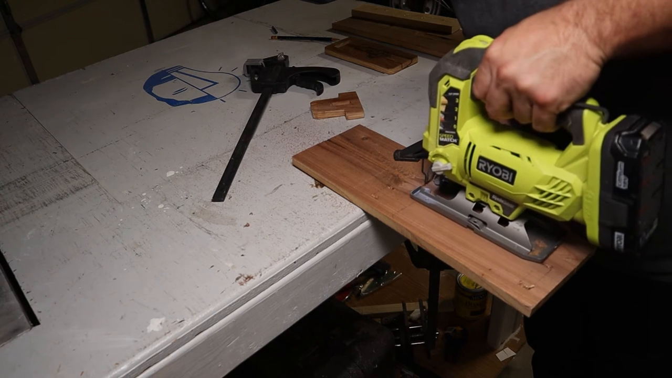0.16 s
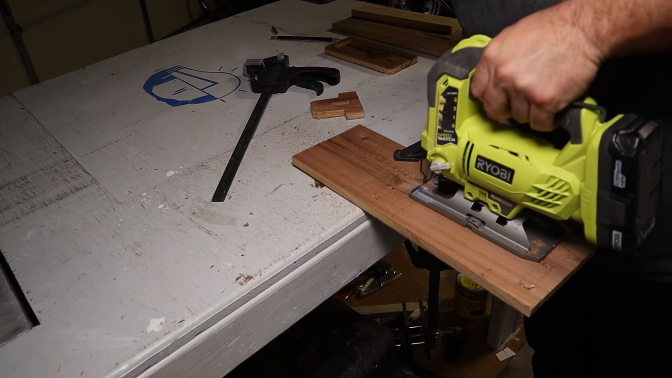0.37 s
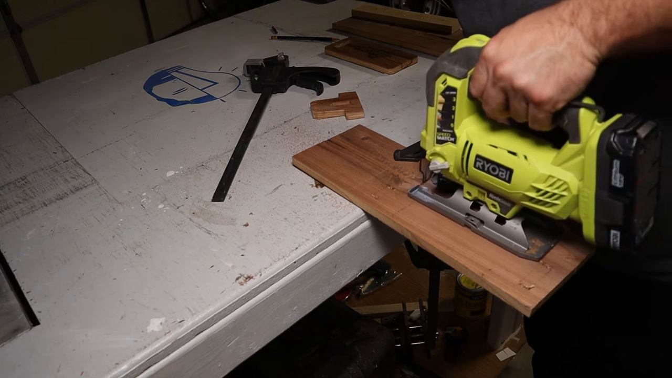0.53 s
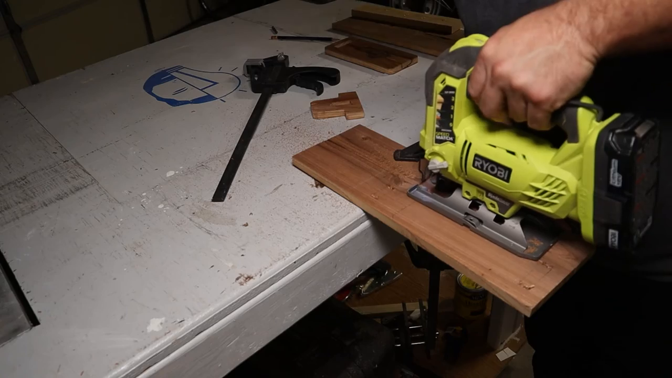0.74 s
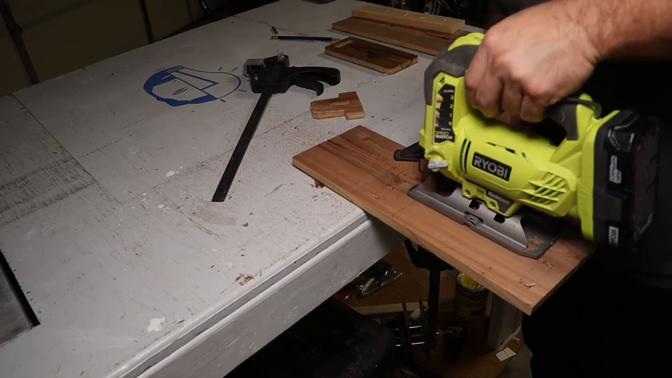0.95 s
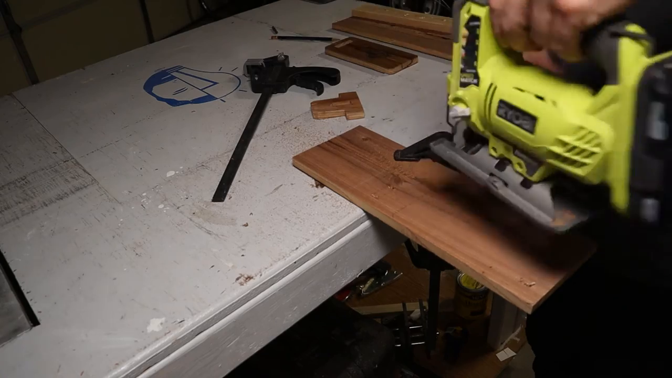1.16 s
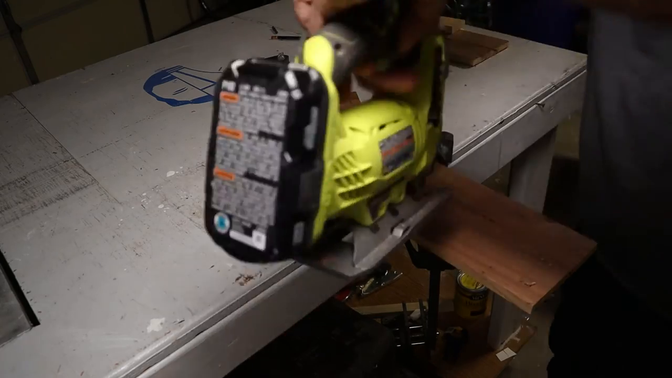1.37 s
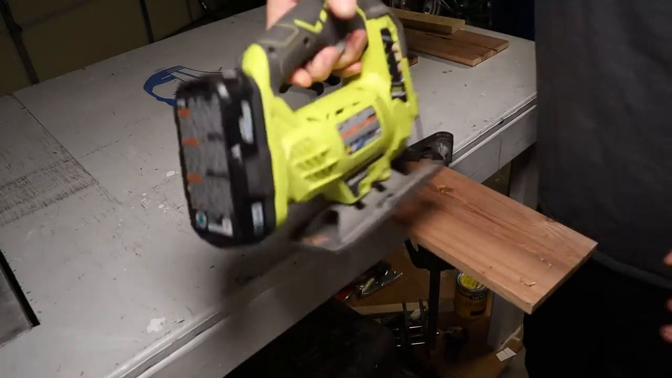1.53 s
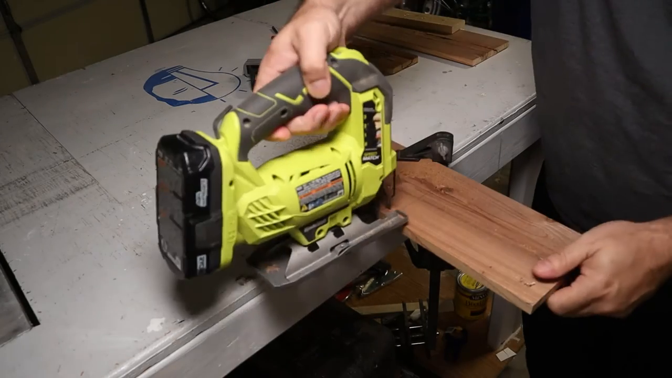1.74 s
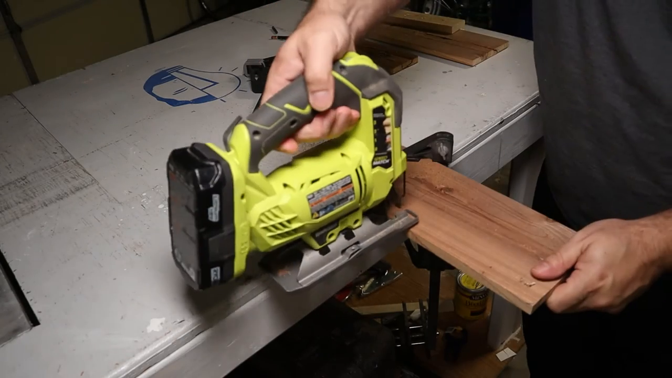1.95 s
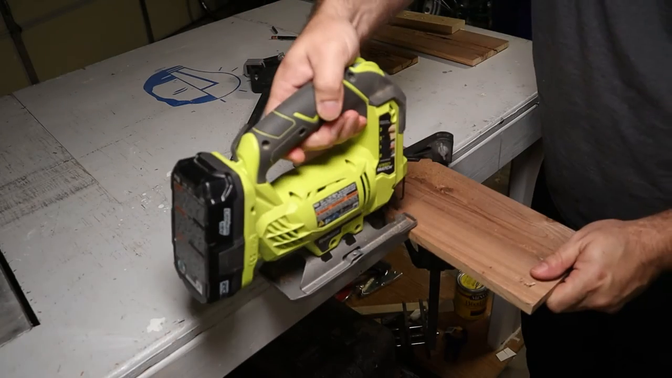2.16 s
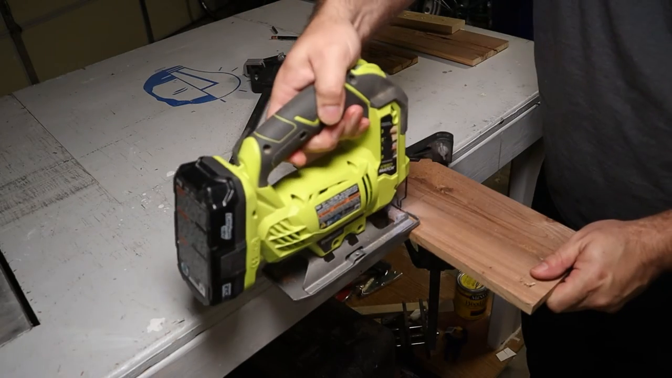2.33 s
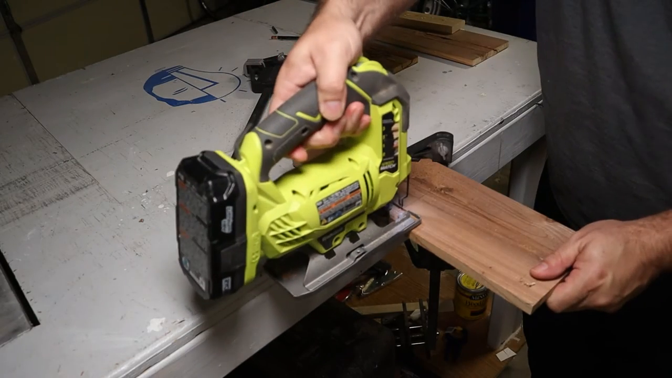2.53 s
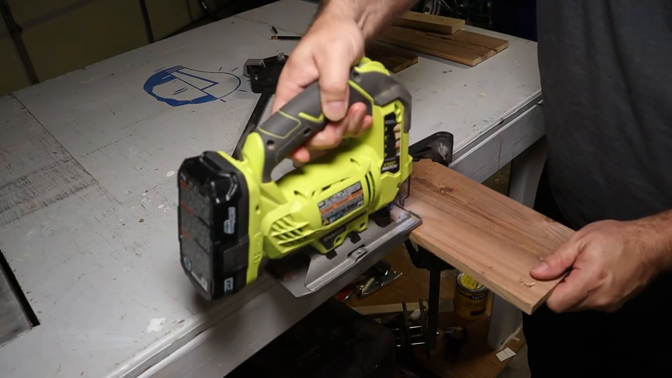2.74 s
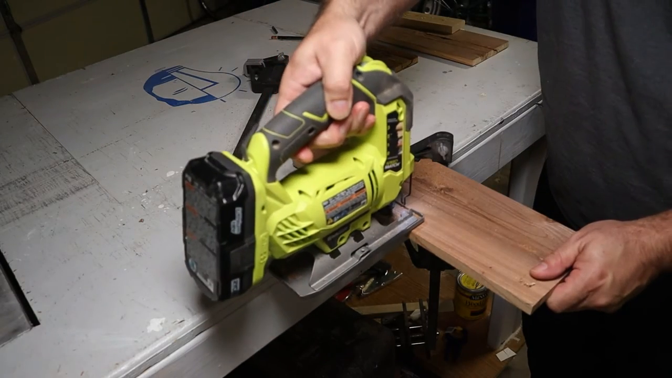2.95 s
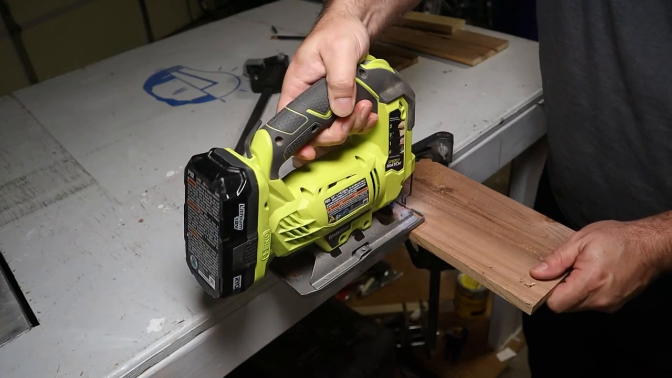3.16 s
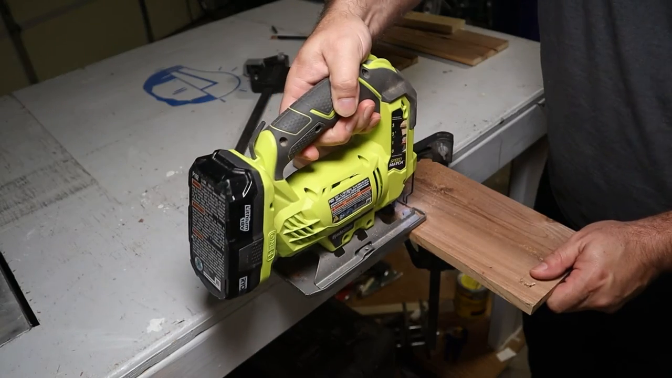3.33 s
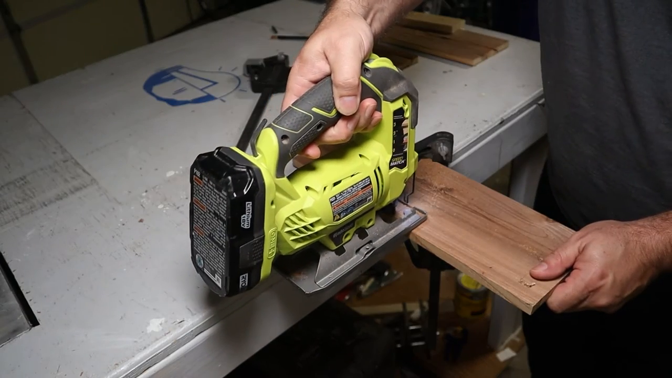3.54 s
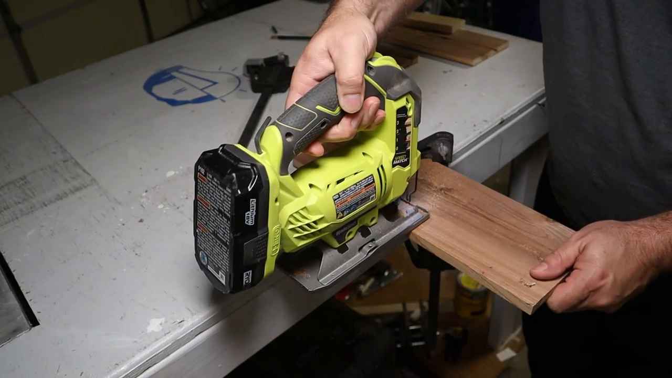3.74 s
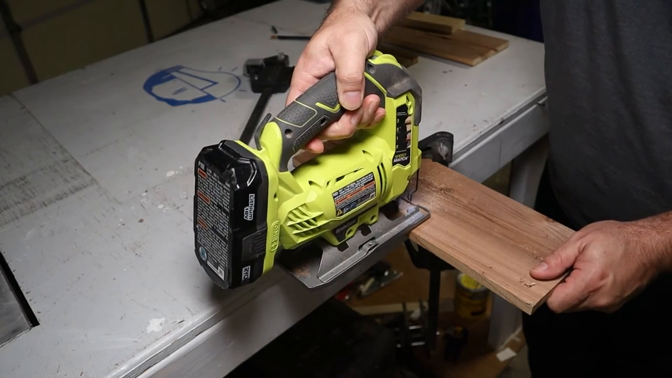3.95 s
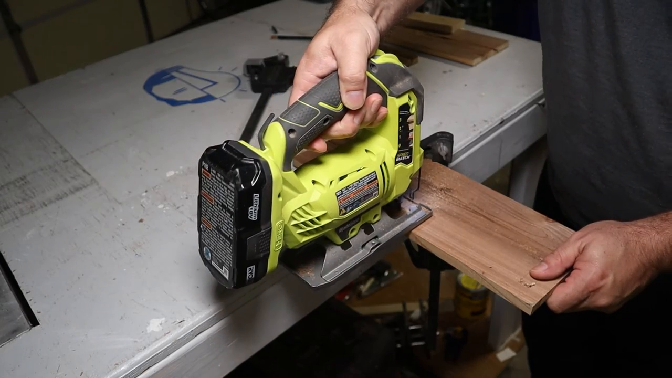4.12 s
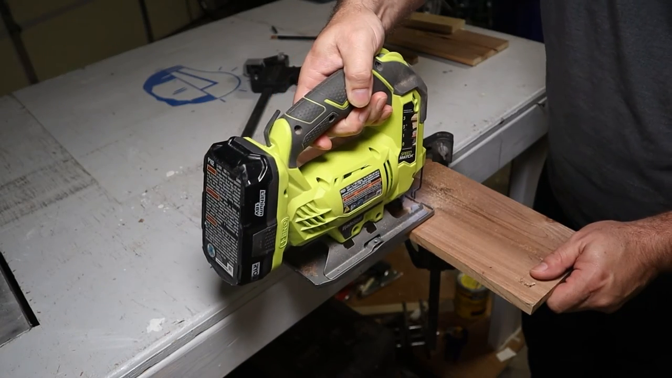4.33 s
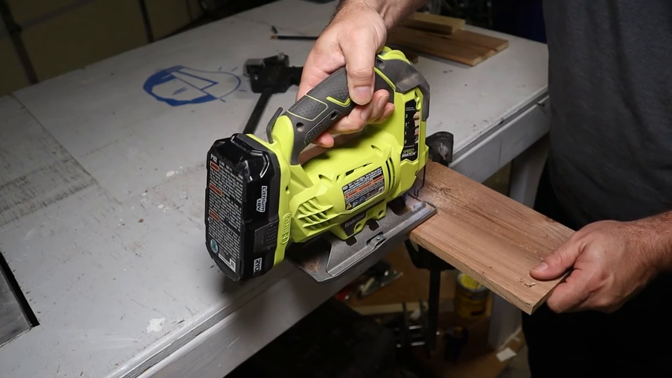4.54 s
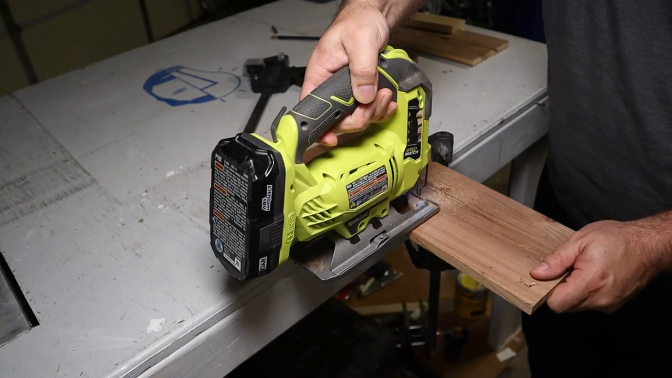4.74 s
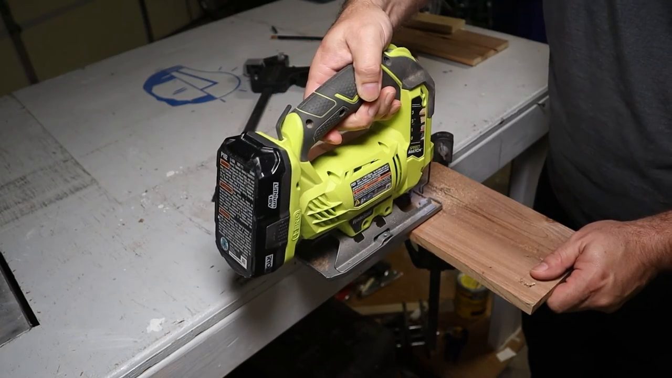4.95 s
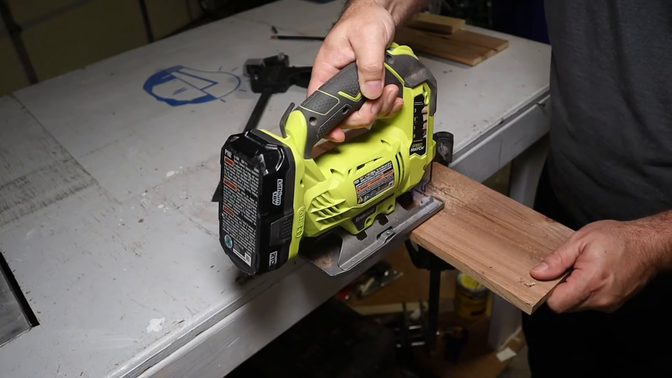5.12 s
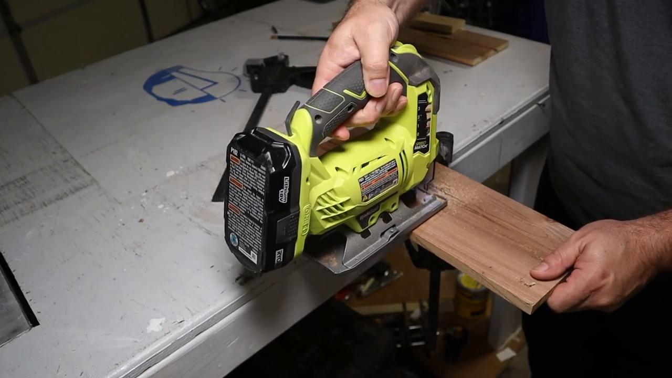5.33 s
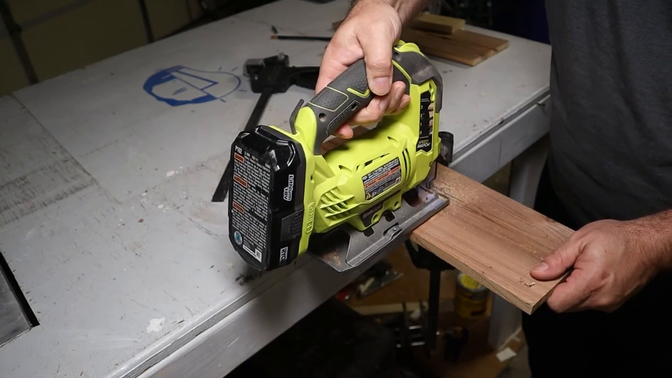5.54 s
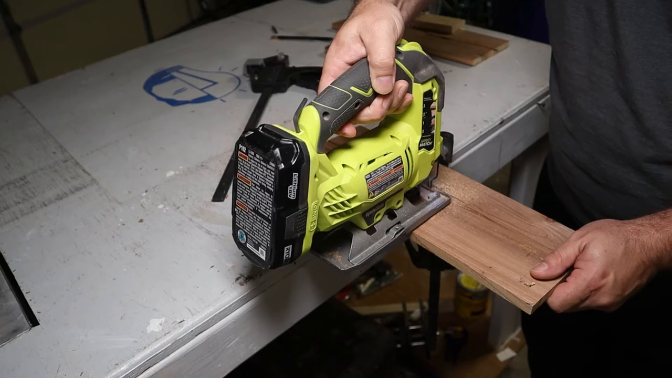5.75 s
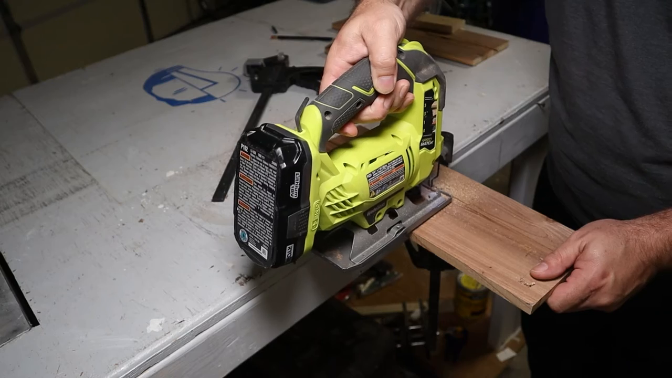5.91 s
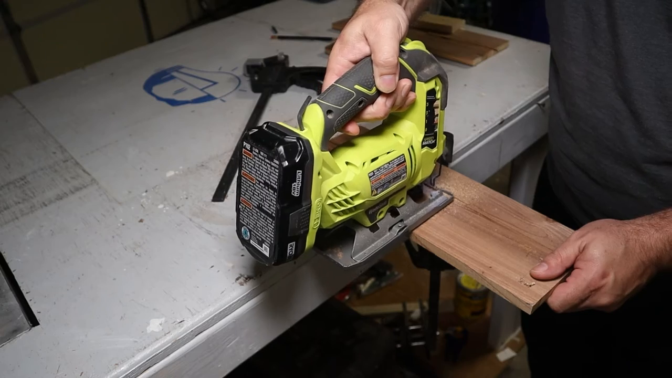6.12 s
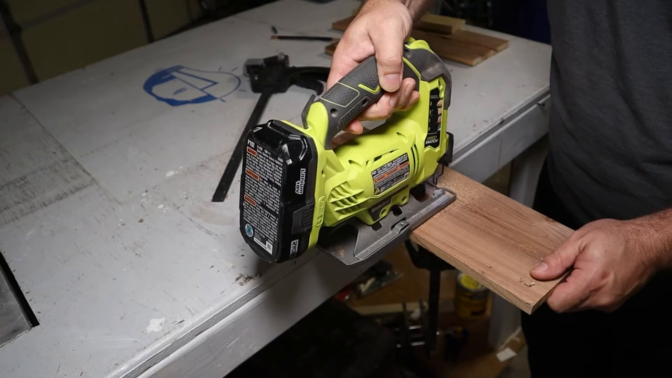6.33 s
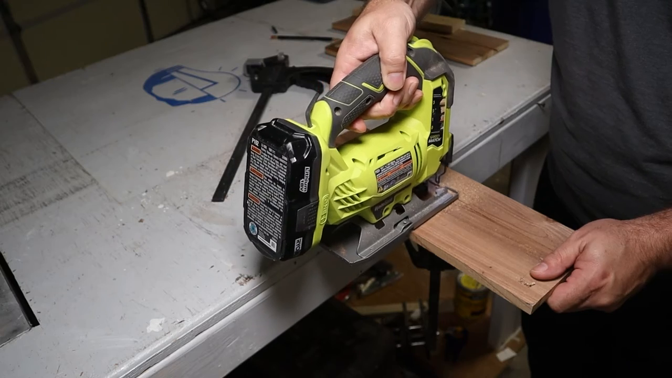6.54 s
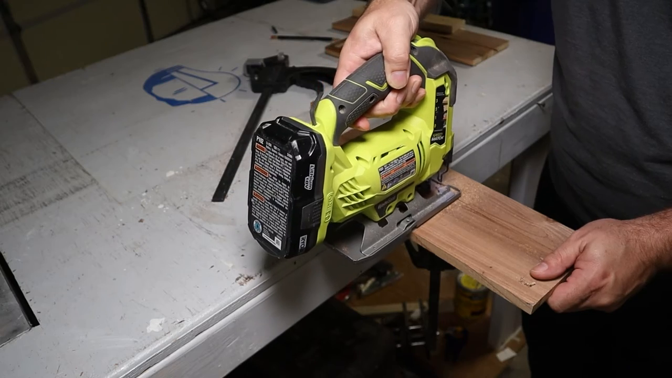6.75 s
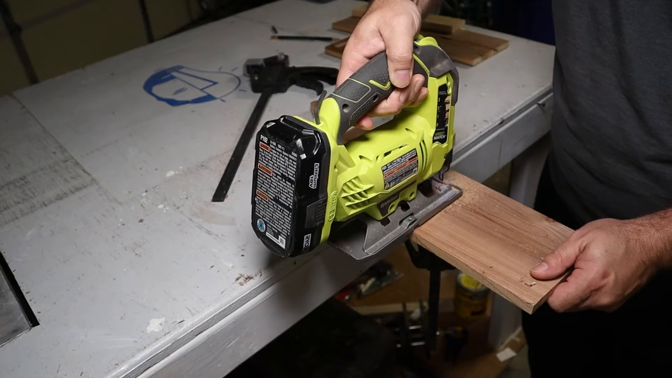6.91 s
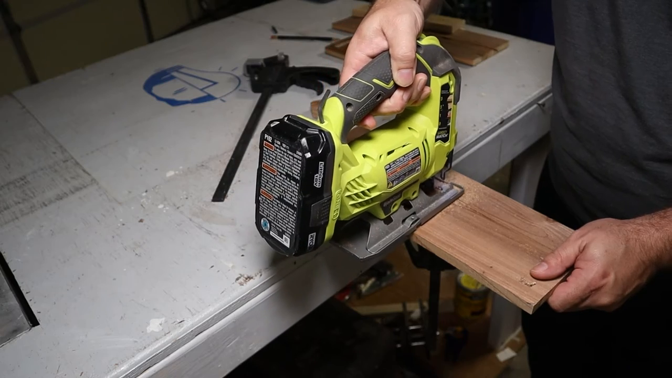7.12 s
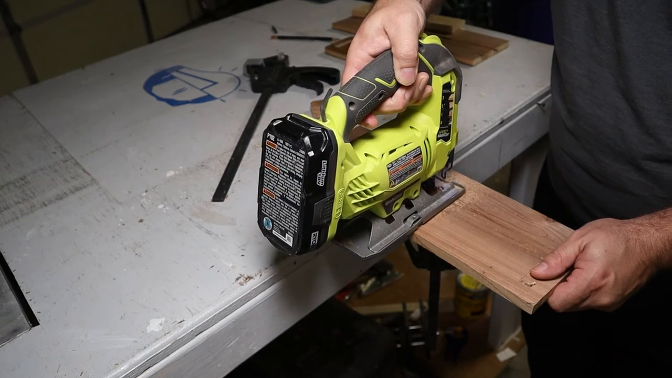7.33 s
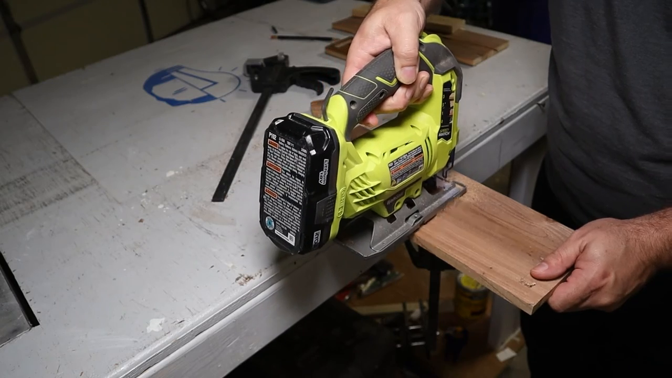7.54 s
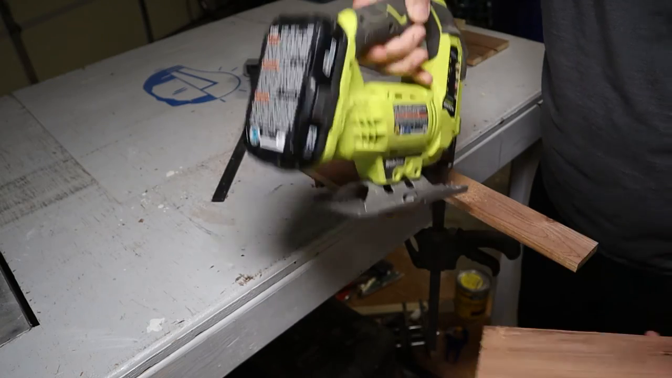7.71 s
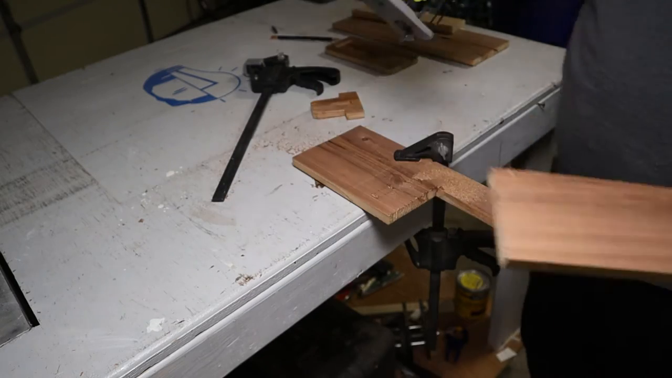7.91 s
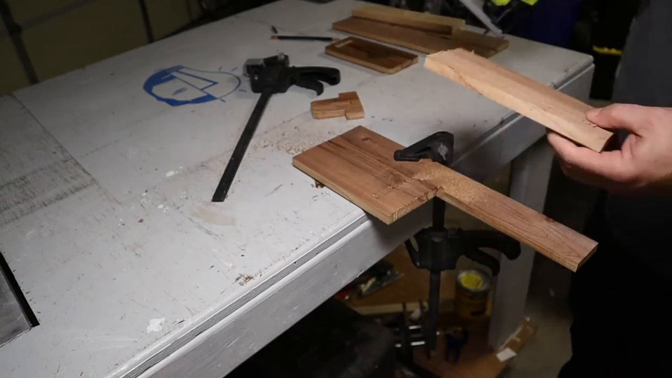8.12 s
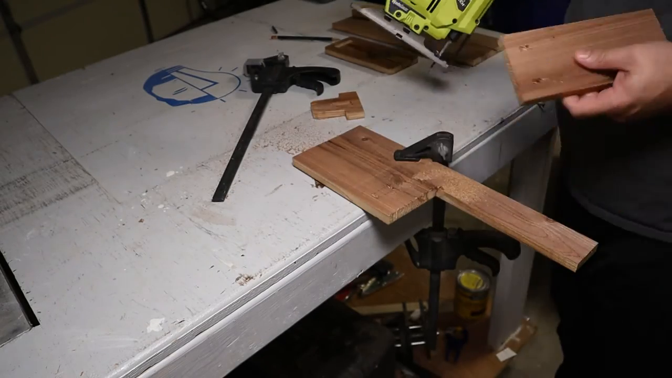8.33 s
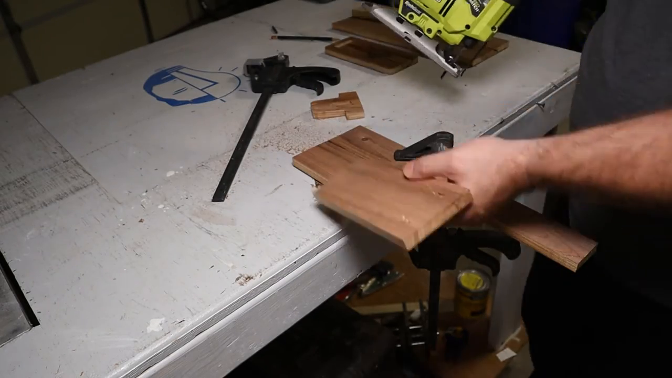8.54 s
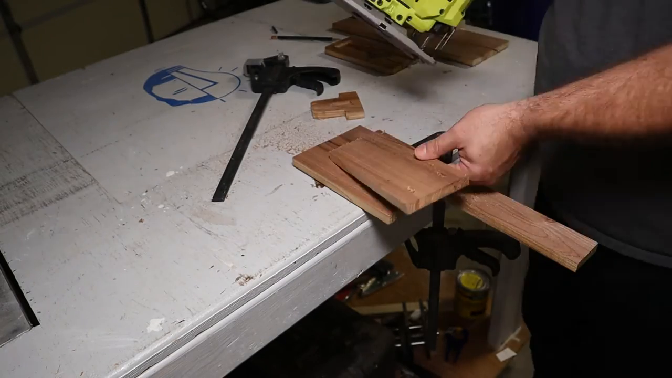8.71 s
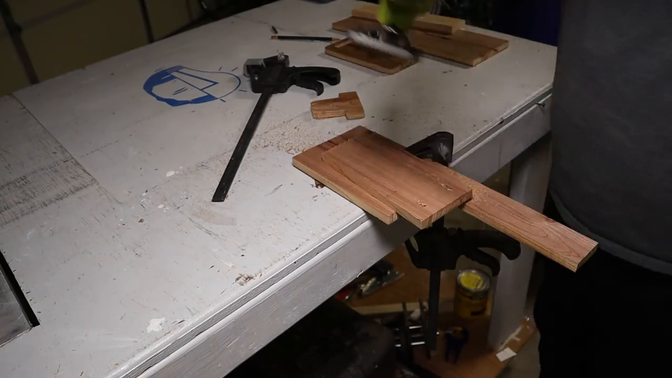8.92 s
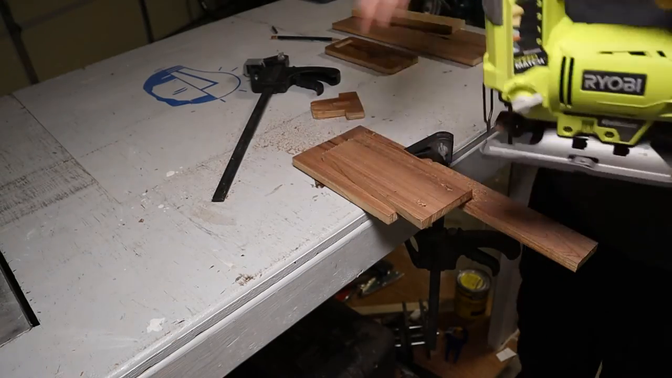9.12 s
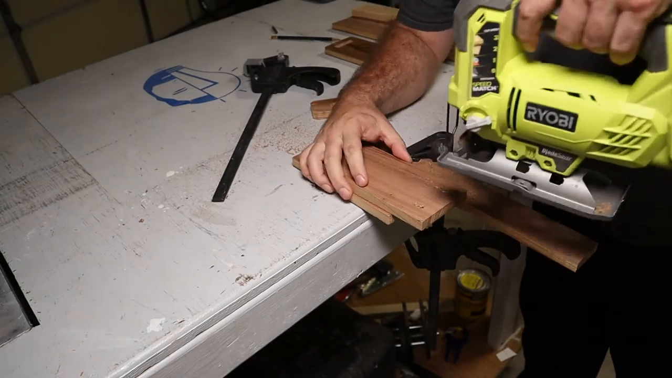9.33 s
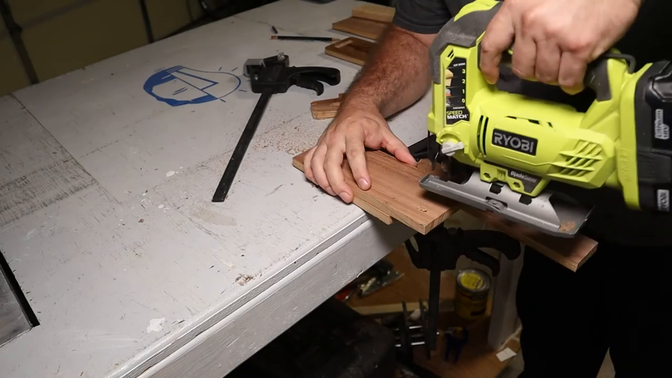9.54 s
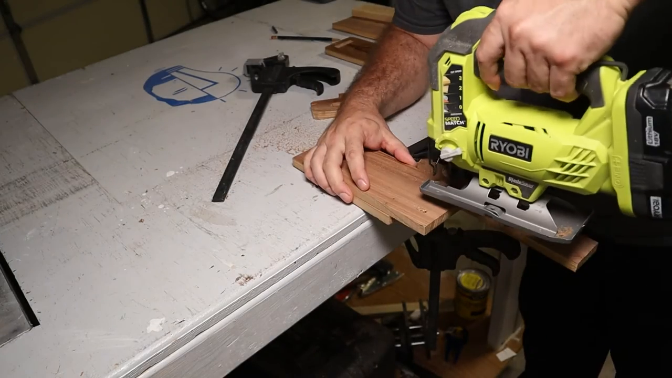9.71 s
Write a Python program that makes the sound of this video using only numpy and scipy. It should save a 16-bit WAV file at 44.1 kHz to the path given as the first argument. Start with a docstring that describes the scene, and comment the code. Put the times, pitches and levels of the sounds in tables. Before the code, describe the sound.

In a small dry workshop, a cordless jigsaw ends a cut with a buzzing rasp and quick brake. Light taps and cloth rustle follow, with a tiny shoe squeak. The trigger clicks and a long, louder, hissy cut with gear whine begins, chattering towards its end until the wood cracks off. The blade stops; a faint hum swells back and offcuts clack. One close microphone with automatic gain.

```python
"""A jigsaw finishes one cut in a board, then makes a long second cut in a workshop.
Rasp is noise renewed over many strokes; knocks excite housing resonances once a stroke; gear whine and
drone are multiples of the stroke rate. Between the cuts and after the second, tool and offcut are handled:
touches ring the board and loose parts, cloth rustles, a shoe squeaks. A hum of beating lines and soft air
noise lie beneath; the recorder's gain sinks under the saw and creeps back up on the hum."""
import sys
import numpy as np
from scipy import signal
from scipy.fft import rfft, irfft, next_fast_len
from scipy.io import wavfile
from scipy.ndimage import uniform_filter1d, minimum_filter1d

SR = 44100
rng = np.random.default_rng(int(sys.argv[2]) if len(sys.argv) > 2 else 0)


def field_ratio(decibels):
    """Amplitude ratio for a level in dB (20 dB per decade); scalars and array-likes work."""
    return 10 ** (np.asarray(decibels, dtype=float) / 20)


def to_wav(sig):
    """Store sig (one row per channel, or 1-D mono) as 16-bit WAV at the path in sys.argv[1].

    Samples outside -1..1 are clipped; the rate is SR.
    """
    pcm = np.clip(np.atleast_2d(sig), -1, 1) * 32767
    pcm = np.round(pcm).astype(np.int16)
    wavfile.write(sys.argv[1], SR, pcm.T)  # frames by channels


N = 430857
T = np.arange(N) / SR   # time of every sample (s)

# Trigger and brake, one row a cut: pulled t/s, spin-up time constant t/s, brake on t/s, braking t/s
RUNS = [(-1.0, .05, .82, .155), (2.337, .021, 7.683, .18)]
# Full blade speed under load, one list a cut: t/s, stroke rate f/Hz
STROKE_RATE = [
    [(0.05, 148.7), (0.426, 149.2), (0.654, 147.5), (0.8, 149.0)],
    [(2.45, 160.0), (2.65, 161.8), (2.84, 159.8), (3.78, 157.8), (3.83, 156.3), (4.21, 156.7),
     (4.51, 154.9), (5.85, 154.7), (5.94, 155.8), (6.14, 152.0), (6.24, 153.8), (6.31, 149.3),
     (6.35, 151.8), (6.52, 151.1), (6.57, 153.2), (7.6, 151.0)],
]
# How hard the teeth bite, one list a cut: t/s, relative level/dB
BITE = [
    [(0.0, -34.5), (0.5, -33.5), (0.74, -29.5), (0.82, -30), (0.93, -27)],
    [(2.339, -46.5), (2.348, -23), (2.62, -22.5), (4.03, -22.5), (4.33, -23.5), (4.63, -22.5), (5.22, -24),
     (5.96, -23.5), (6.13, -20.5), (6.19, -24), (6.27, -20), (6.31, -23.5), (7.51, -26), (7.61, -24.5),
     (7.65, -28), (7.822, -28)],
]
# Balance of each cut: rasp tilt level/dB, drone level/dB, knock level/dB
CUT_BALANCE = [(-3.5, -53.5, -21), (0.06, -45, -48.5)]
# Share of the rasp's power that recurs each stroke, in the first and second cut
TEETH_REPEAT = (.65, .45)
# Spectrum of teeth in wood: f/Hz, relative density level/dB
RASP_SPECTRUM = [(15, -62.5), (25, -21.5), (104, -37.5), (233, -33), (400, -32.5), (850, -25.5),
                 (1080, -19), (2070, -13.5), (2560, -9), (3540, -7.5), (4890, -2.5), (8150, -2),
                 (11600, 2.5), (14000, -0.5), (15100, -5.5), (15750, -11), (16100, -29)]
# Housing resonances: f/Hz, width f/Hz, level/dB in the first cut, level/dB in the second
HOUSING = [(2500, 450, -11.5, -31.5), (3200, 400, -19, -15.5), (4000, 350, -11.5, -10.5),
           (4860, 530, -5, -11.5), (5470, 390, 6, 7), (6170, 690, 6, 2), (7330, 880, 2.5, -0.5),
           (8700, 1170, 2.5, -21.5), (10670, 1000, -3.5, -7), (11600, 600, -13, -11), (13030, 1100, 5, -7),
           (14450, 980, -13, -12.5)]
# Bouts of hard chatter near the edge: middle t/s, level/dB
CHATTER = [(6.009, -22), (6.054, -28), (6.152, -25), (6.288, -12), (6.33, -20), (6.401, -20.5),
           (6.455, -24.5), (6.501, -23), (6.573, -23), (6.629, -19.5), (6.696, -19.5), (6.744, -24),
           (6.824, -16.5), (6.881, -16.5), (6.946, -22), (7.042, -17), (7.179, -17), (7.268, -25.5),
           (7.311, -22), (7.362, -28), (7.41, -20.5), (7.466, -17.5), (7.533, -15), (7.622, -16.5)]
# Drone of board and tool, first cut then five stages of the second: multiple of stroke rate, relative level/dB
DRONE_STAGES = [
    [(1, -11.5), (2, -1.5), (3, -4), (4, -2.5), (5, -8), (6, -8), (7, -10), (8, -5), (9, -6.5), (10, -7),
     (11, -7), (12, -5), (13, -14.5), (14, -2.5), (15, -12.5), (16, -1), (17, -4), (18, -4)],
    [(1, -25), (2, -24.5), (3, -29), (4, -10.5), (5, -28.5), (6, -1.5), (7, 6), (8, -7.5), (9, -15),
     (10, 3), (11, 1.5), (12, -18.5), (13, -12.5), (14, -6.5), (15, 3.5), (16, 8), (17, 7.5), (18, -2)],
    [(1, -20), (2, -16.5), (3, -48), (4, -20.5), (5, -39.5), (6, -4), (7, -1), (8, -7), (9, -1.5), (10, 7),
     (11, -16.5), (12, -7.5), (13, -23.5), (14, -17.5), (15, -4.5), (16, -6.5), (17, -8.5), (18, -19)],
    [(1, -21), (2, -24.5), (3, -43), (4, -36), (5, -39), (6, -10), (7, -1.5), (8, -4), (9, -5), (10, -4),
     (11, -37), (12, -2.5), (13, -22), (14, -13), (15, -8), (16, -5), (17, -7), (18, -28)],
    [(1, -18.5), (2, -7.5), (3, -45), (4, -14), (5, -25), (6, -16.5), (7, -11), (8, -8.5), (9, 2), (10, -3),
     (11, -8), (12, -8.5), (13, -18), (14, -15.5), (15, -22.5), (16, -9.5), (17, -6), (18, -3)],
    [(1, -18.5), (2, -7), (3, -28.5), (4, -22.5), (5, -18), (6, -22.5), (7, -15.5), (8, -7.5), (9, 5.5),
     (10, 0.5), (11, -10.5), (12, -0.5), (13, -11.5), (14, -20.5), (15, -26.5), (16, -18), (17, -5),
     (18, -27.5)],
]
# When each drone stage holds: t/s
DRONE_TIMES = [2.3, 2.34, 3.95, 4.55, 5.9, 6.9]
# Gear mesh and its sidebands: multiple of stroke rate, relative level/dB
GEAR_LINES = [(52, -6), (55, -2), (58, 0), (59, -9), (60, 0), (61, -9), (62, 0), (63, -3), (64, 0), (66, 0)]
# Workshop hum lines: f/Hz, rms level/dB
HUM_LINES = [(224.2, -79), (240, -68.5), (319, -92), (480, -81.5), (704, -81), (720, -78), (960, -83),
             (1200, -87.5), (1440, -100), (1920, -95.5), (2160, -98.5), (2400, -97.5)]
# Spectrum of the air noise: f/Hz, relative density level/dB
AIR_SPECTRUM = [(18, -55.5), (30, -27.5), (165, -21), (238, -18), (294, -12), (612, -18.5), (716, -9.5),
                (860, -18), (955, -12), (1090, -22), (1210, -22), (1570, -22), (12800, -36), (15800, -35.5)]
# Modes of the board: f/Hz, relative level/dB, decay by 60 dB t/s
BOARD_MODES = [(680, -19, .05), (1000, -10, .06), (1290, -14.5, 0.021), (1560, -2.5, 0.054),
               (1810, -6, 0.031), (1940, -3, 0.013), (2350, -4.5, 0.021), (2480, -4.5, 0.031),
               (3000, -2, 0.038), (3700, -17, 0.013)]
# Modes of the tool's loose parts: f/Hz, relative level/dB, decay by 60 dB t/s
LOOSE_PARTS = [(4050, -9.5, 0.016), (5300, 1, 0.0084), (5440, -5, 0.036), (5850, -6.5, .015),
               (7170, -9.5, .02), (8900, -7, 0.012), (14500, -8, .01)]
# Spectrum of a scuff: f/Hz, relative density level/dB
SCUFF_SPECTRUM = [(500, -37.5), (1100, -7), (2200, -6), (3600, 6), (8700, 8.5), (12500, 7.5), (15300, -1),
                  (16500, -33.5)]
# Handling of tool and offcut: t/s, scuff level/dB, wood level/dB, wood colour f/Hz
TOUCHES = [(1.1115, -57, -64, 1990), (1.127, -67, -69, 2000), (1.4545, -62, -66, 700),
           (1.531, -71, -82, 2000), (1.6453, -60, -86, 2000), (1.8225, -63, -77, 705),
           (2.022, -64, -75, 2020), (7.9794, -62, -79, 2000), (8.3858, -66, -92, 1980),
           (8.4442, -67, -72, 1980), (8.553, -69, -96, 2000), (8.6083, -66, -79, 2000),
           (8.6352, -66, -89, 2040), (8.67, -80, -88, 2000), (8.7097, -49, -43, 1560),
           (8.7595, -57.5, -62.5, 2590), (8.839, -63, -49.5, 1720), (8.8745, -45, -47.5, 2000),
           (8.8927, -58, -45.5, 2130), (8.9135, -66, -68, 2000), (9.0294, -64, -66, 1500),
           (9.0867, -70, -71, 1500), (9.111, -66, -82, 1500), (9.1498, -58, -59, 1880),
           (9.2, -66, -90, 2000), (9.2447, -59, -90, 3000), (9.2636, -69, -90, 2000),
           (9.301, -71, -73, 1900), (9.3165, -53, -53.5, 1840), (9.3383, -49, -45.5, 1940),
           (9.382, -55, -69, 2500), (9.424, -46, -64, 2060), (9.6724, -67, -76, 2000),
           (9.7438, -53, -68, 2020)]
# Trigger click, motor's first kick, splinters, board parting: t/s, scuff level/dB, wood level/dB, colour f/Hz
CRACKS = [(2.311, -52, -88.5, 2500), (2.3396, -21, -70, 2500), (4.9712, -16, -42, 3600),
          (5.3404, -15, -38, 3300), (7.6279, -7, -29, 2300)]
# Movements of hands and cloth: middle t/s, half length t/s, level/dB
MOVES = [(1.116, 0.017, -68), (1.248, .008, -78), (1.279, 0.007, -68), (1.454, 0.045, -82),
         (1.534, 0.0091, -71), (1.598, 0.028, -80), (1.659, 0.019, -61), (2.043, 0.38, -99),
         (7.95, 0.063, -74), (8.108, 0.28, -78), (8.406, 0.012, -67), (8.449, 0.0227, -69.5),
         (8.625, 0.046, -72), (8.863, 0.069, -71.5), (9.094, 0.046, -72), (9.153, 0.01, -72),
         (9.257, 0.017, -81), (9.323, 0.054, -64.5), (9.446, 0.044, -70), (9.66, 0.13, -98)]
# Spans with the tool held aloft, its parts hanging loose: start t/s, end t/s
ALOFT = [(1.07, 1.16), (7.85, 8.95)]
# Spectrum of skin and cloth: f/Hz, relative density level/dB
RUSTLE_SPECTRUM = [(500, -45), (1100, -15), (2200, -3.5), (3600, -5.5), (6500, -1), (9000, -1.3),
                   (13500, 5.5), (15300, -4), (16500, -33.5)]
# Squeak of shoe on wood: t/s, slip rate f/Hz, level/dB
SQUEAK = [(1.94, 680, -100), (1.96, 695, -71.5), (2.0, 705, -73), (2.03, 693, -100)]

SECOND_START_S = RUNS[1][0]
IN_SECOND = T > SECOND_START_S
SINCE_SECOND = (T - SECOND_START_S).clip(0)


def rms_one(x):
    """Normalisation: division by the root of the mean power."""
    return x / np.sqrt(np.mean(x ** 2) + 1e-20)


def in_time(rows):
    """Linear interpolation: table columns joined by straight lines at every sample."""
    s, *columns = np.transpose(rows)
    return [np.interp(T, s, c) for c in columns]


def with_pauses(tables):
    """Gating: the tables of several cuts are joined, every level sinking to silence around them."""
    rows = []
    for table in tables:
        quiet = [-120] * (len(table[0]) - 1)
        rows += [[table[0][0] - 1e-3] + quiet]
        rows += table
        rows += [[table[-1][0] + 1e-2] + quiet]
    return in_time(rows)


def ramp(t, start, length):
    """Linear transition: 0 before start, 1 after start + length."""
    return np.clip((t - start) / length, 0, 1)


def coloured(x, spectrum):
    """Spectral shaping: x weighted by a smooth spectrum over log frequency; rms 1."""
    size = next_fast_len(N)
    hz, db = np.transpose(spectrum)
    log_hz = np.log(np.arange(size // 2 + 1) * SR / size + 1)
    weight = field_ratio(np.interp(log_hz, np.log(hz), db))
    return rms_one(irfft(rfft(x, size) * weight, size)[:N])


def drift(rate):
    """Low-pass random fluctuation: noise through a double pole at `rate` Hz; spread 1."""
    hop, settle = 40, 2000   # samples per slow step, slow steps discarded
    r = np.exp(-2 * np.pi * hop * rate / SR)
    noise = rng.standard_normal(N // hop + settle + 2)
    slow = rms_one(signal.lfilter([1], [1, -2 * r, r * r], noise)[settle:])
    return np.interp(np.arange(N) / hop, np.arange(len(slow)), slow)


def resonance(x, hz, width):
    """Two-pole resonance: a band of gain 1 at its top."""
    r = np.exp(-np.pi * width / SR)
    zeros = np.array([1, 0, -1]) * (1 - r * r) / 2
    poles = [1, -2 * r * np.cos(2 * np.pi * hz / SR), r * r]
    return signal.lfilter(zeros, poles, x + 1e-18)


def ring(clicks, modes):
    """Modal vibration: clicks set each damped mode of a body ringing."""
    out = 0
    for hz, db, t60 in modes:
        r, w = field_ratio(-60 / (t60 * SR)), 2 * np.pi * hz / SR
        out = out + field_ratio(db) * signal.lfilter([0, np.sin(w)], [1, -2 * r * np.cos(w), r * r], clicks + 1e-18)
    return out


def high_passed(x, hz):
    """Second-order high-pass: bass below `hz` is removed."""
    return signal.sosfilt(signal.butter(2, hz, "high", fs=SR, output="sos"), x)


def repeating_noise(turns, keeps):
    """Cyclic excitation: a noise pattern recurs each stroke and renews itself over `keeps` strokes."""
    size = 288   # points per pattern
    age = turns / keeps
    patterns = rng.standard_normal((4000, size))
    old, spot = age.astype(int), (turns % 1 * size).astype(int)
    fade = age % 1 * np.pi / 2   # crossfade of equal power
    return patterns[old, spot] * np.cos(fade) + patterns[old + 1, spot] * np.sin(fade)


def workshop():
    """Beating: close hum lines of a buzzing machine interfere, over soft air noise."""
    hum = 0
    for hz, db in HUM_LINES:
        line = np.sin(2 * np.pi * (hz * T + rng.random()))
        hum = hum + np.sqrt(2) * field_ratio(db + 1.0 * drift(2.0)) * line
    air = coloured(rng.standard_normal(N), AIR_SPECTRUM)
    return hum + field_ratio(-78 + 2.9 * drift(18.0)) * air


def blade():
    """Motor inertia: speed rises exponentially and the brake ramps it down; gives share, rate and strokes done."""
    brake_curve = 1.4   # fast fall at first, then lingering until the blade locks
    running = 0
    for on, up, off, down in RUNS:
        spin_up = 1 - np.exp(-(T - on).clip(0) / up)
        braking = np.clip(1 - (T - off) / down, 0, 1) ** brake_curve
        running = running + np.clip(np.minimum(spin_up, braking), 0, 1)
    speed, = in_time(STROKE_RATE[0] + STROKE_RATE[1])
    speed = speed + 0.3 * drift(6) + 0.3 * drift(25)   # slow and quick unevenness, strokes per s
    first_stroke_done = 0.24
    return running, speed, first_stroke_done + np.cumsum(speed * running) / SR


def rasp(turns, level_db, tilt_db):
    """Periodic tearing: noise partly alike each stroke, louder on the pull, with splinters sticking out."""
    repeat = np.where(T < RUNS[0][2], *TEETH_REPEAT)
    tear = np.sqrt(repeat) * repeating_noise(turns, keeps=12)
    tear = tear + np.sqrt(1 - repeat) * rng.standard_normal(N)
    # the slow first strokes of the second cut stand apart
    gate_db = 2.0 + 4 * IN_SECOND * np.exp(-SINCE_SECOND / 0.05)
    grit_db = 1.2 * drift(270) + 0.17 * drift(9)
    tear = coloured(tear * field_ratio(gate_db * np.cos(2 * np.pi * turns) + grit_db), RASP_SPECTRUM)
    # a dip opens in the spectrum late in the second cut
    dip_depth = 0.68 * ramp(T, 5.0, 1.8)
    tear = tear - dip_depth * resonance(tear, 8300, 1200)
    dull = signal.sosfilt(signal.butter(1, 6000, fs=SR, output="sos"), tear)
    tilted = dull * field_ratio(-tilt_db) + (tear - dull) * field_ratio(tilt_db)
    return field_ratio(level_db + 2.5) * tilted


def knock_force(running, knock_db):
    """Impact strength: grows steeply with speed and as the uncut wood narrows, and eases once it parts."""
    parted_s, bout_s = 7.632, 0.019
    fade_db = 5 * T * ~IN_SECOND   # the knocks weaken by 5 dB per s through the first cut
    edge_db = 17 * ramp(T, 5.9, 0.45) - 16 * ramp(T, parted_s, 0.006)
    force = field_ratio(knock_db - fade_db + edge_db) * running ** 5.0
    # after the trigger the holder takes up its slack
    force *= np.where(IN_SECOND, ramp(T, SECOND_START_S + 0.17, 0.05), 1)
    chatter = sum(field_ratio(db) * np.exp(-((T - s) / bout_s) ** 2) for s, db in CHATTER)
    return force + chatter * (T < parted_s)


def knocks(turns, running, knock_db):
    """Impact excitation: each stroke the blade holder strikes the housing with a click and short rough burst."""
    burst, click = 0.074, 16.0   # burst decay (strokes), click size against the burst
    stroke, phase = turns.astype(int), turns % 1
    uneven_db = np.where(IN_SECOND, 2.3, 1.0) * np.clip(rng.standard_normal(2000), -2, 2)[stroke]
    rough = repeating_noise(turns, keeps=18.0) * phase / burst * np.exp(-phase / burst)
    clicks = np.diff(np.floor(turns - burst), prepend=-1)
    blow = rms_one(rough + click * clicks) * knock_force(running, knock_db) * field_ratio(uneven_db)
    out = 0
    for k, (hz, width, early_db, late_db) in enumerate(HOUSING):
        # the blow reaches the parts a little apart in time, and the higher parts come and go more
        delayed = np.roll(blow, 15 * (k % 3) // 2)
        level_db = np.where(IN_SECOND, late_db, early_db) + (hz / 7000.0) ** 2 * drift(10)
        part = resonance(resonance(delayed, hz, 1.63 * width), hz, width)
        out = out + (-1) ** k * field_ratio(level_db) * part
    return field_ratio(1.0) * out


def overhang(saw):
    """Sympathetic resonance: the free end of the board rings with the first cut."""
    return field_ratio(14) * resonance(saw * ~IN_SECOND, 1031, 19)


def whine_level(speed, running):
    """Loaded mesh: loudest at one speed under load; off load the level has no best speed, and flutters."""
    best_speed, loss_db = 154, 0.16   # strokes per s, loss per (strokes per s) squared
    loaded_db = -27.8 - loss_db * (speed - best_speed) ** 2 + 1.0 * drift(1.3)
    coasting_db = -29 + 2.5 * drift(40)
    start_db = 7 * IN_SECOND * np.exp(-SINCE_SECOND / 0.04)   # the starting torque makes the gears cry out
    return coasting_db + (loaded_db - coasting_db) * running ** 8 + start_db


def gear_whine(turns, speed, level_db, load):
    """Tooth mesh: multiples of the stroke rate shaken by backlash sweep with the blade's speed."""
    gearbox_hz, reach_hz, lift_db = 9390, 260, 9   # lines near this resonance stand out
    mesh = 60
    lines = 0
    for k, db in GEAR_LINES:
        lift = lift_db * load * np.exp(-((k * speed - gearbox_hz) / reach_hz) ** 2)
        # off load the mesh multiple gains on its sidebands by 12 dB
        coasting = 12 * (1 - load) * ((k == mesh) - .5)
        waver = 1.2 * drift(6.7) + .8 * drift(90)
        phase = k * turns + rng.random() + 0.04 * drift(40)
        lines = lines + field_ratio(db + lift + coasting + waver) * np.sin(2 * np.pi * phase)
    return field_ratio(level_db) * rms_one(lines)


def drone(turns, level_db):
    """Harmonic vibration: multiples of the stroke rate waver separately, the higher ones more."""
    out = 0
    for rows in zip(*DRONE_STAGES):
        multiple = rows[0][0]
        db = np.interp(T, DRONE_TIMES, [row[1] for row in rows])
        db = db + (0.8 + .03 * multiple) * drift(4.7)
        out = out + field_ratio(db) * np.sin(2 * np.pi * (round(multiple) * turns + rng.random()))
    return field_ratio(level_db) * out


def room(x):
    """Reverberation: convolution with a short decaying noise tail."""
    t = np.arange(int(.3 * SR)) / SR
    t60_s = 0.14
    tail = rng.standard_normal(len(t)) * field_ratio(-60 * t / t60_s) * (t > .004)
    return x + field_ratio(-15) * signal.fftconvolve(x, tail / np.sqrt(np.sum(tail ** 2)))[:N]


def swung():
    """Support condition: true while the tool is in the air."""
    return sum((T > start) * (T < end) for start, end in ALOFT)


def touches(events, t60, attack):
    """Contact excitation: a crack and scuff shake the loose parts and strike the board near one pitch."""
    reach_octaves = 0.5   # reach of a blow among the board's modes
    scuff, jolt, board = np.zeros((3, N + SR))
    t = np.arange(int(.3 * SR)) / SR
    rise, fall = 1 - np.exp(-t / attack), field_ratio(-60 * t / t60)
    for s, scuff_db, wood_db, colour_hz in events:
        i = round(s * SR)
        span = slice(i, i + len(t))
        crack = field_ratio(-t * 9300)   # falls by 9300 dB per s
        scuff[span] += field_ratio(scuff_db) * rise * (0.33 * fall + 0.94 * crack)
        jolt[i] = field_ratio(scuff_db + 17)
        blow = 0.11 * rise * fall * rng.standard_normal(len(t)) + (t == 0)
        struck = []
        for hz, db, ring_s in BOARD_MODES:
            distance = np.log2(hz / colour_hz) / reach_octaves
            struck.append((hz, db + wood_db - 10.0 * distance ** 2, ring_s))
        board[span] += ring(blow, struck)
    loose = field_ratio(-32.5 + 14 * swung())   # parts speak louder while the tool is aloft
    grains = rng.standard_normal(N) * field_ratio(4.4 * drift(170))
    parts = ring(loose * (scuff[:N] * grains + jolt[:N]), LOOSE_PARTS)
    return scuff[:N] * coloured(grains, SCUFF_SPECTRUM) + parts + high_passed(board[:N], 400)


def rattle():
    """Friction and random impact: hands rustle with every move, loose parts tick while the tool is swung."""
    still_db, ticks_per_s = -92, 300.0
    moving = field_ratio(still_db) + sum(field_ratio(db) * np.exp(-((T - s) / half) ** 2) for s, half, db in MOVES)
    sizes = field_ratio(1.7 * np.minimum(rng.exponential(1, N), 4)) * rng.choice([-1, 1], N)
    ticks = (rng.random(N) < ticks_per_s / SR) * sizes
    ticks = ticks * field_ratio(-5.5) * swung()
    rustle = field_ratio(2.5 * drift(90) + 1.5 * drift(12)) * coloured(rng.standard_normal(N), RUSTLE_SPECTRUM)
    # each part comes and goes on its own
    ticking = sum(ring(ticks * moving * field_ratio(5 * drift(9)), [part]) for part in LOOSE_PARTS)
    return ticking + rustle * moving


def squeak():
    """Stick-slip: regular pulses are heard through two resonances."""
    slip_hz, db = in_time(SQUEAK)
    slips = np.diff(np.floor(np.cumsum(slip_hz) / SR), prepend=0)
    voice = sum(resonance(resonance(slips, hz, 1200), hz, 1200) for hz in (4100, 6200))
    return field_ratio(db + 2.1 * drift(60)) * rms_one(voice)


def handling():
    """Superposition: all that the hands do to tool and wood, and the squeak."""
    return touches(TOUCHES, t60=0.06, attack=0.00017) + rattle() + squeak()


def cracks():
    """Sudden release: trigger, kick, splinters and parting board crack sharply, without bass."""
    return high_passed(touches(CRACKS, t60=0.011, attack=0.00014), 800)


def jigsaw():
    """Coupled sources: one blade motion drives rasp, knocks, whine and drone; cracks are added."""
    running, speed, turns = blade()
    bite_db, = with_pauses(BITE)
    tilt_db, drone_db, knock_db = (np.where(IN_SECOND, late, early) for early, late in zip(*CUT_BALANCE))
    tilt_db = tilt_db + 4 * (1 - running ** 2)   # off load the body of the rasp thins out
    saw = rasp(turns, bite_db, tilt_db) * running + knocks(turns, running, knock_db)
    saw += overhang(saw)
    whine = gear_whine(turns, speed, whine_level(speed, running), load=running ** 4)
    saw += whine * running ** 1.15 * (bite_db > -100)   # the whine fades as the blade slows
    # the drone follows the bite a little; the parted offcut no longer resounds
    pressed_db = np.where(IN_SECOND, 0.15 * (bite_db + 19), 0) + 1.1 * drift(25)
    pressed_db -= 9 * ramp(T, CRACKS[-1][0], 0.015)
    saw += drone(turns, drone_db + pressed_db) * running ** 6   # it stops as soon as the blade slows
    return saw + cracks()


def scene():
    """Superposition: saw and handling in the room, over the workshop, heard by one microphone."""
    mono = room(jigsaw() + handling()) + workshop()
    return np.array([mono, mono])


def gain_control(x):
    """Automatic gain: quiet sound is lifted; the lift sinks fast under the saw and climbs back steadily."""
    aim_db, most_lift_db = -30, 23
    sense_s, drop_s, recover_db_per_s = 0.015, 0.035, 23.5
    step = 44   # samples between gain values
    r = np.exp(-1 / (sense_s * SR))
    power = signal.lfilter([1 - r], [1, -r], x[0] ** 2, zi=[.01])[0]
    level_db = 10 * np.log10(power[::step] + 1e-12)
    lift_db, now = [], 0
    sink, climb = min(step / SR / drop_s, 1), recover_db_per_s * step / SR
    for wanted in np.clip(aim_db - level_db, 0, most_lift_db):
        if wanted > now:
            now += min(wanted - now, climb)
        else:
            now += sink * (wanted - now)
        lift_db.append(now)
    return x * field_ratio(np.interp(np.arange(N) / step, np.arange(len(lift_db)), lift_db))


def limited(x):
    """Peak limiting: a fast gain that looks ahead holds peaks under a ceiling."""
    ceiling, size = 0.95, round(.0015 * SR)
    gain = minimum_filter1d(ceiling / np.maximum(np.abs(x), ceiling), size=2 * size + 1, axis=1)
    return x * uniform_filter1d(uniform_filter1d(gain, size=size, axis=1), size=size, axis=1)


def roll_off(x):
    """The treble ends steeply here."""
    return signal.sosfilt(signal.butter(12, 16290, fs=SR, output="sos"), x)


def record(dry):
    """Recording chain: the gain is controlled, peaks limited, bass and top cut."""
    mix = limited(gain_control(dry))
    mix = signal.sosfilt(signal.butter(1, 67, "high", fs=SR, output="sos"), mix)
    mix = signal.sosfilt(signal.cheby2(16, 50, 16050, fs=SR, output="sos"), mix)   # 50 dB down from 16050 Hz
    return roll_off(mix)


dry = scene()
out = record(dry)
to_wav(out)
```